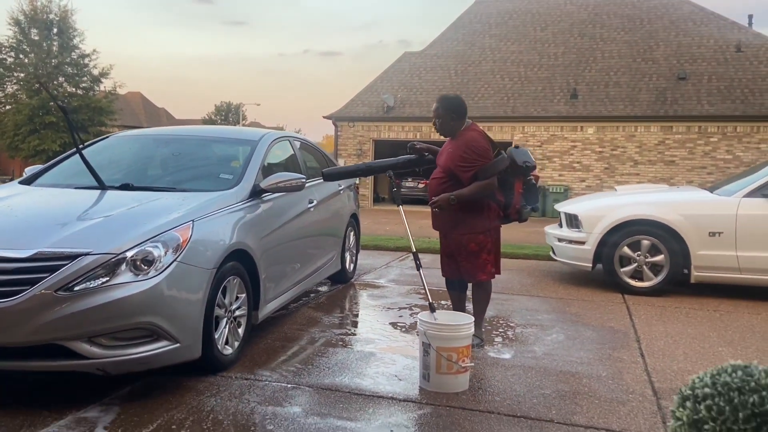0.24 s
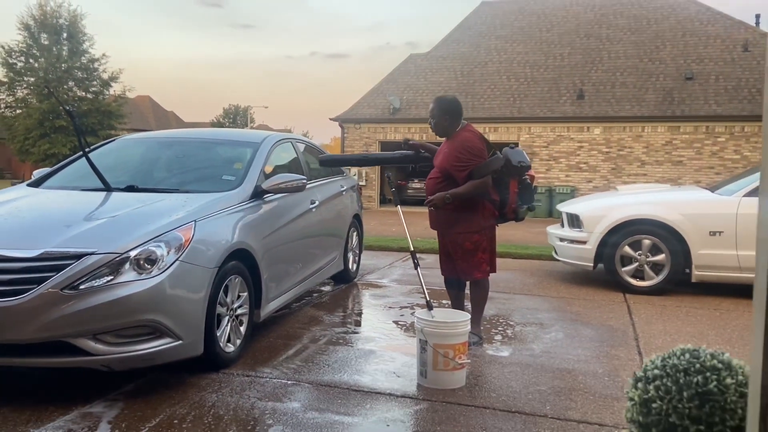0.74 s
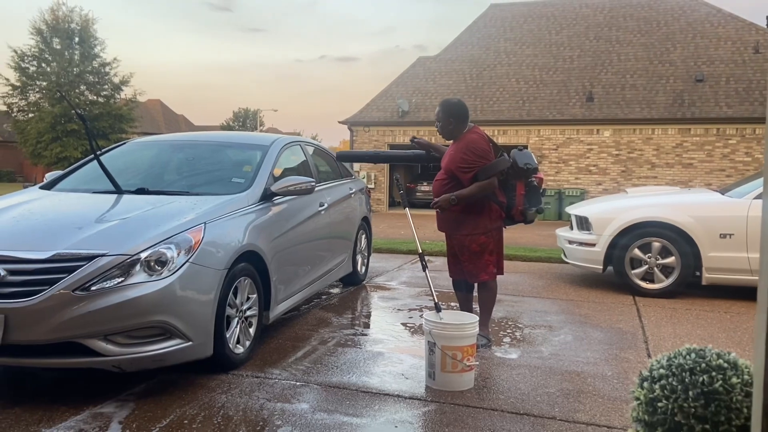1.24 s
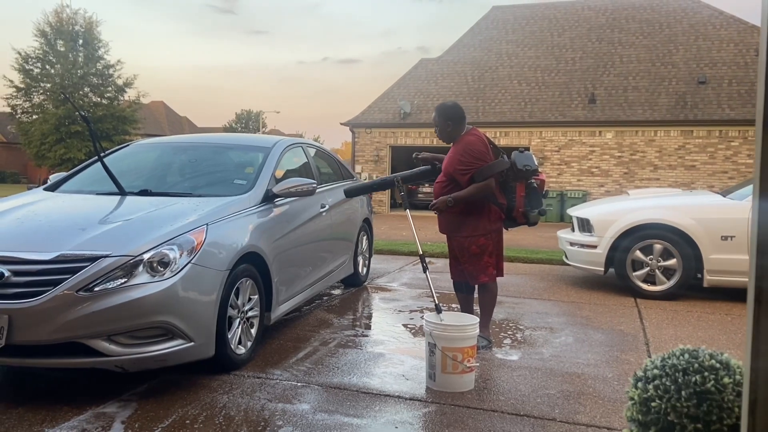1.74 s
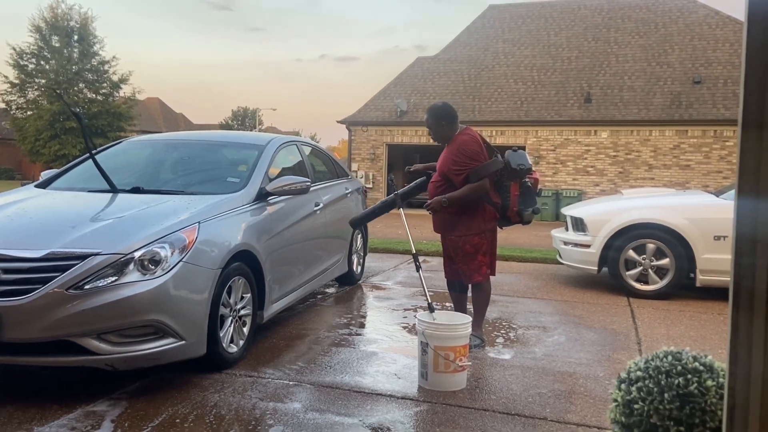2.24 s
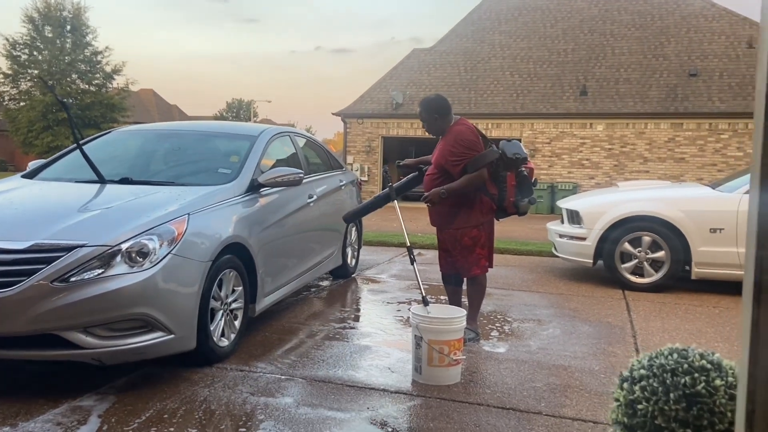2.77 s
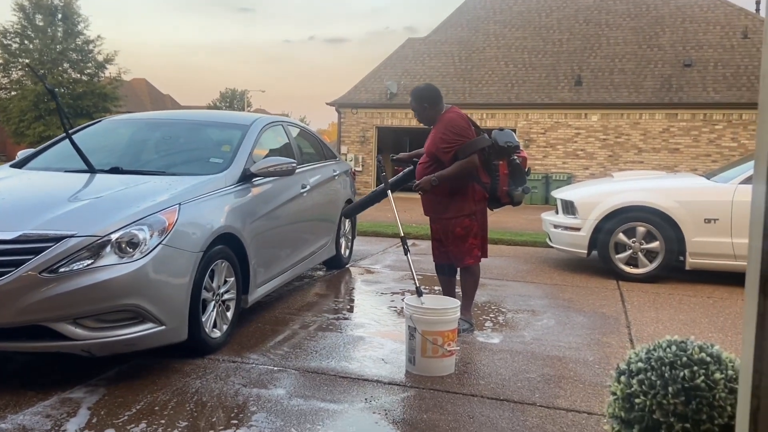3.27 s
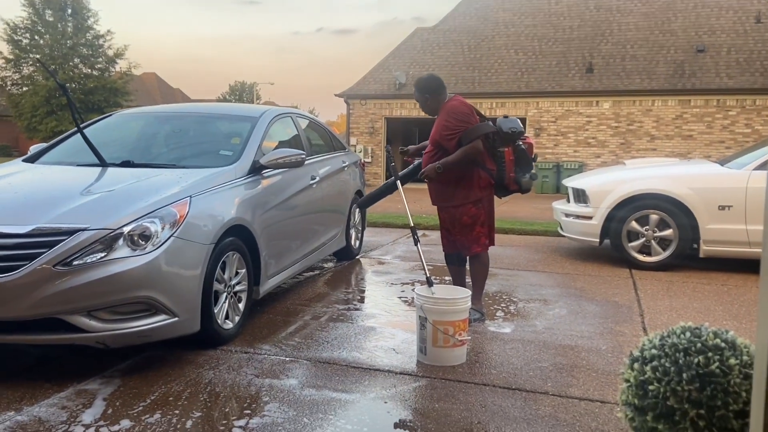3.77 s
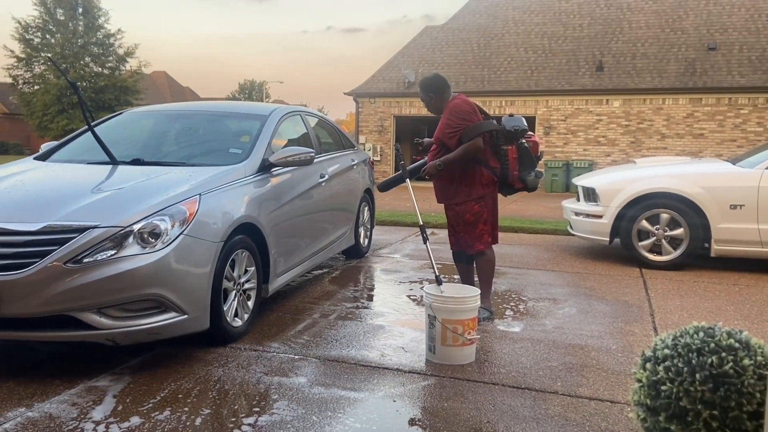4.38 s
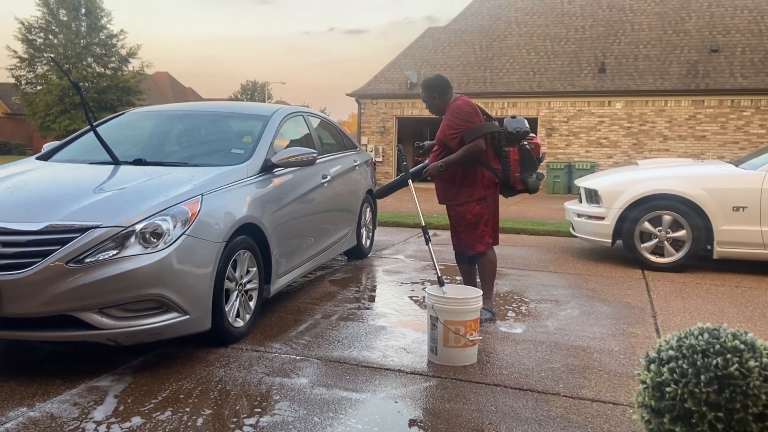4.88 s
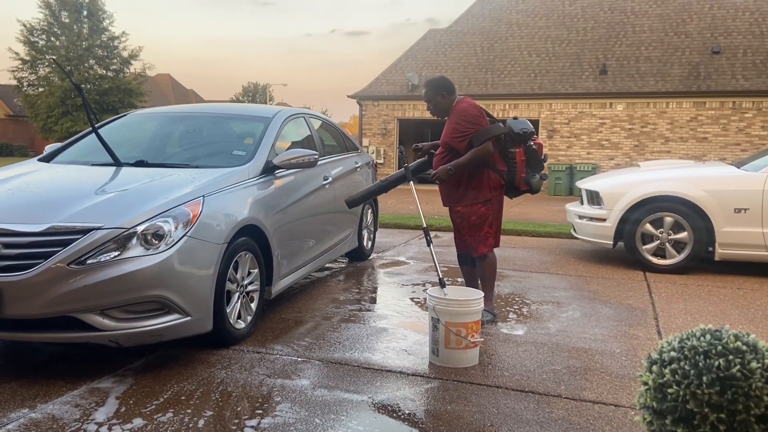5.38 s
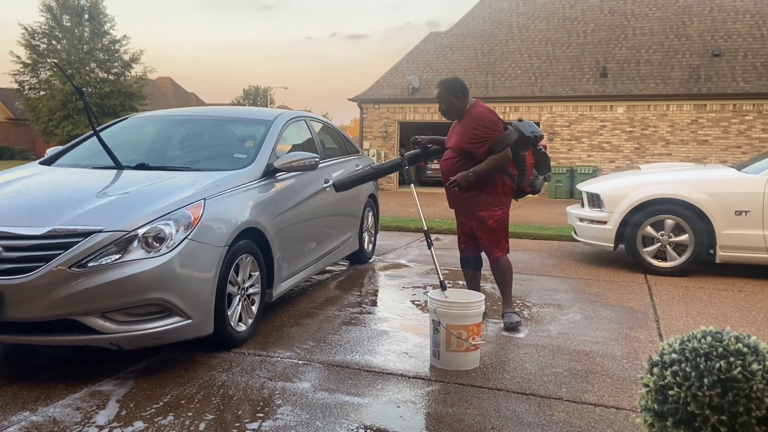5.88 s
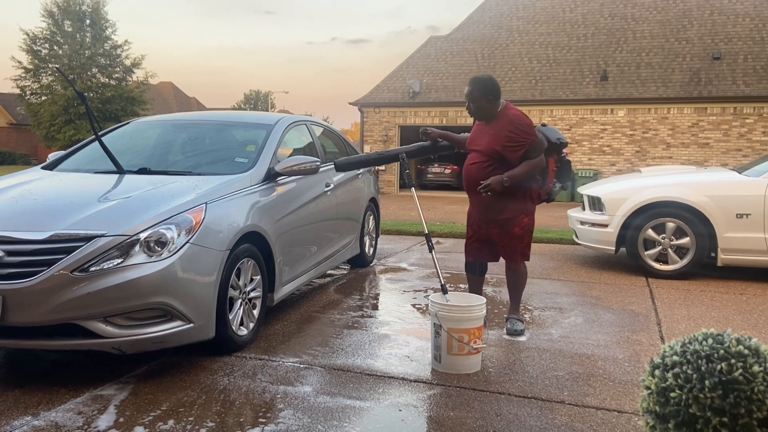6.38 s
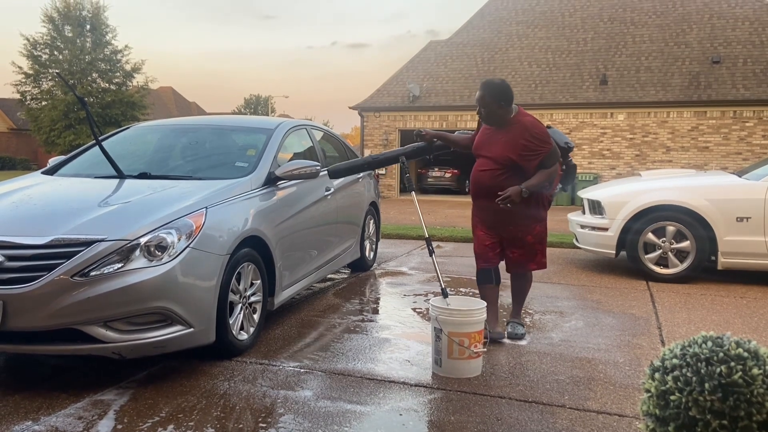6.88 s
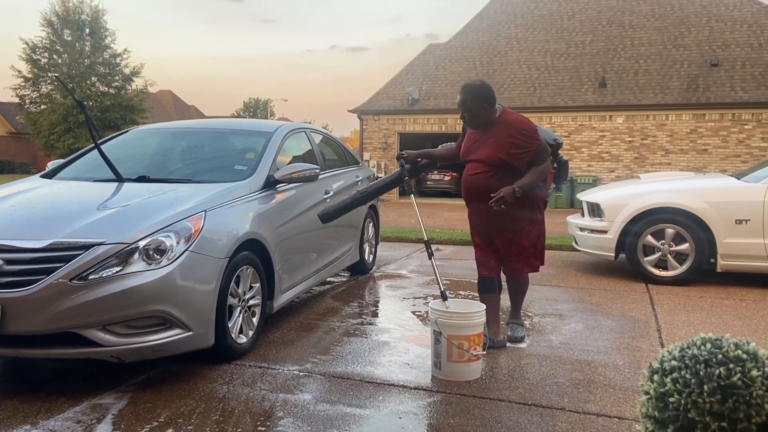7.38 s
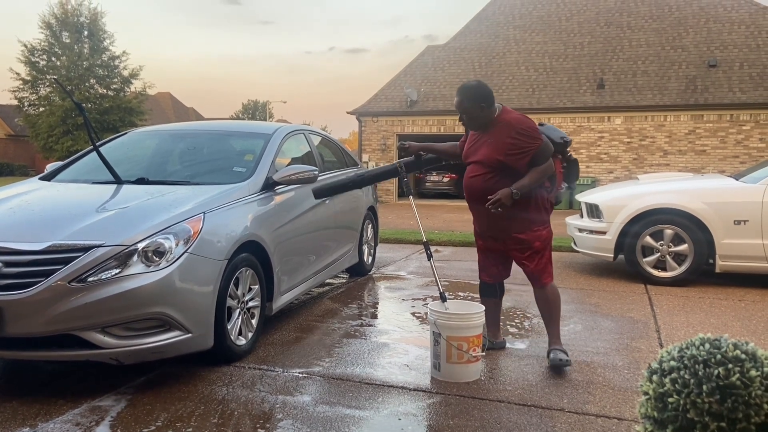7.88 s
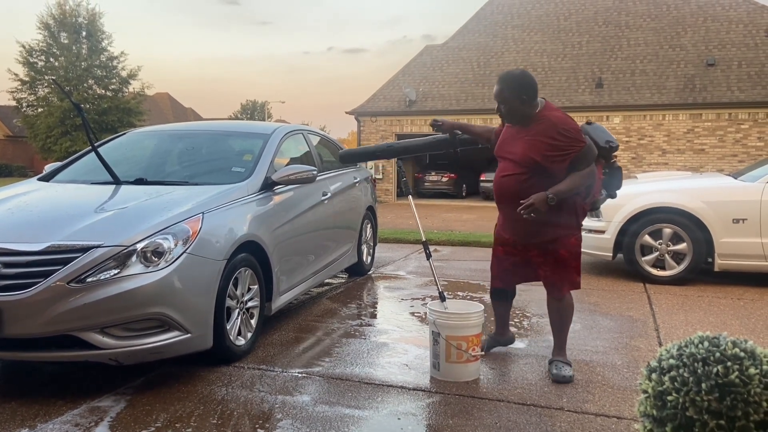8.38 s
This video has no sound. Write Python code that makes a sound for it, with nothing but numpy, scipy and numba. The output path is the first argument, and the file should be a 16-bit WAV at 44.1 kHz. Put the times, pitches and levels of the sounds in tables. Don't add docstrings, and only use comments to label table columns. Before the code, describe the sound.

Steady two-stroke engine buzz and dense, windy roar, already running at the start and still running at the end. The air blast swells in different ranges as it strikes a wet car, briefly making hollows sing low and mid-pitched. Higher ringing whines drift past. Toward the end the wearer turns, dulling the fan and changing the engine's colour. Outdoor driveway, stereo phone a few metres away, slightly compressed.

```python
import sys
import numpy as np
from scipy import signal
from scipy.fft import rfft, irfft, next_fast_len
from scipy.io import wavfile
from scipy.ndimage import uniform_filter1d
from numba import njit

SR = 44100
rng = np.random.default_rng(int(sys.argv[2]) if len(sys.argv) > 2 else 0)


def gain_from_decibels(decibels):
    exponent = np.asarray(decibels, float) / 20
    return 10 ** exponent


def transcribe(u):
    v = np.clip(np.atleast_2d(u).T, -1, 1)
    q = np.round(v * 32767).astype(np.int16)
    wavfile.write(sys.argv[1], SR, q)


N = 380580
STEP = 30
TIME = np.arange(N // STEP + 2) * STEP / SR

# (start [s], end [s], first pitch [Hz], last pitch [Hz], level [dB])
HOLLOW_HUMS = [
    (1.32, 1.6, 102, 102, -40),
    (1.6, 2.2, 102, 102, -48),
    (2.8, 3.6, 101, 100, -46),
    (3.897, 4.75, 101, 101, -39),
    (1.45, 1.8, 270, 338, -39.5),
    (1.85, 2.052, 305, 320, -36),
    (3.62, 3.83, 335, 319, -36),
    (4.22, 4.55, 308, 300, -37.5),
    (4.552, 4.72, 300, 325, -41),
]
# (frequency [Hz], level [dB per Hz])
JET_COLOUR = [(25, -93), (42, -81), (63, -66), (100, -63), (150, -65), (210, -59), (320, -58.5), (480, -59),
              (750, -54), (1400, -59), (2200, -64), (3600, -71), (6500, -75), (16000, -87.5)]
# (frequency [Hz], common share [0-1])
PORT_LIKENESS = [(60, 0.87), (250, 0.8), (640, 0.49), (1400, 0.44), (2500, 0.36), (5300, 0.24),
                 (6800, 0.74), (9000, 0.98), (16000, 0.29)]
# (frequency [Hz], left minus right [dB])
PORT_BALANCE = [(60, 0), (110, 2), (200, 4.5), (380, -1.0), (700, 1.5), (1290, 2), (2380, -1), (4400, 3),
                (8120, 0.0), (15000, 0.0)]
# (frequency [Hz], lead [rad])
PORT_LEAD = [(30, 0), (1000, -.1), (2400, -.8), (4000, -.4), (5600, -2.5), (6800, 0), (8450, .84 * np.pi),
             (9550, 1.15 * np.pi), (11050, 2 * np.pi), (13200, 3 * np.pi), (17400, 5 * np.pi)]
# (frequency [Hz], width [Hz], level [dB])
REFLECTIONS = [(305, 60, 1.5), (400, 50, -1.5), (1110, 280, -2), (1420, 270, 1.5), (1800, 330, -2),
               (2185, 350, 2), (2650, 210, -1.5), (3110, 630, 3.5), (4580, 400, -2), (5430, 550, 1),
               (6500, 1460, -2), (8260, 2300, 2)]
# (start
# [s], end [s], centre [Hz], level [dB])
ROAR_SWELLS = [(-0.1, 0.7, 330, 5), (-0.1, .58, 680, 6.3), (.7, 1.45, 380, -2), (1.5, 2.7, 280, 4),
               (2.76, 3.68, 370, 7.5), (5.07, 5.8, 340, 3), (6, 6.42, 294, 7), (6.25, 6.3, 830, 2.5),
               (6, 6.0, 60, 2), (5.5, 6.4, 55, 7), (6.5, 8.0, 60, 2), (-.2, 2.3, 70, -3),
               (2.5, 2.3, 290, 1.5), (2.7, 5.7, 5300, 1), (2.3, 5.0, 12000, 0.5), (6.4, 8.8, 12000, -1.6),
               (8, 7.7, 540, 2), (5.5, 7.0, 410, -1.5), (.8, 2.4, 165, -5), (6.5, 8.7, 180, 2),
               (6, 7.1, 710, 2), (7.22, 7.88, 293, 12.5), (8, 8.3, 750, 4.5), (3, 4.3, 2400, 1.5),
               (5.0, 5.5, 1700, 0.5)]
# (time [s], turns per second [Hz])
SHAFT_SPEED = [(0.0, 119.58), (0.2, 119.66), (0.45, 119.21), (1.95, 119.08), (2.2, 119.22), (2.45, 119.66),
               (2.95, 119.17), (3.45, 119.08), (3.9, 119.5), (4.2, 119.1), (4.7, 119.27), (5.15, 119.12),
               (5.5, 119.6), (5.95, 119.67), (7.2, 119.08), (7.7, 119.36), (7.95, 119.87), (8.63, 119.51)]
# (time [s], hidden share [0-1])
WEARER_TURN = [
    (0, 0.04),
    (5.6, 0.02),
    (6.3, 0.47),
    (6.9, 0.85),
    (7.8, 1),
    (8.63, 0.9),
]
# (centre [order], level [dB], fall [dB per order])
FAN_WHINE = [(33, -49, 4), (38, -59, 1), (43, -56.5, 5.5), (52, -66, -2.5), (61, -60, 2.5)]
# (start [s], end [s], centre [order], level [dB])
CASING_GLINTS = [
    (1.3, 2.85, 79, -48.5),
    (3.55, 4.9, 44, -50.5),
    (4.1, 5.1, 63, -53.5),
    (2.6, 3.3, 42, -56),
    (5.6, 5.9, 48, -58),
    (5.7, 5.9, 31, -51),
    (1.3, 3.3, 60, -60.5),
]
# (multiple of shaft [order], level [dB])
PACK_SIDE = [(1, -5), (2, 0.5), (3, -12), (4, -15.5), (5, -6.5), (6, -12.5), (7, -2), (8, -8), (9, -35),
             (10, -24.5), (11, -10.5), (12, -12), (13, -14), (14, -16), (15, -23), (16, -25), (17, -21.5),
             (18, -18), (19, -28), (20, -36.5), (21, -39), (22, -32), (23, -27), (24, -20), (25, -24),
             (26, -20), (27, -22), (28, -25.5), (29, -16), (30, -32.5)]
# (multiple of shaft [order], level [dB])
PACK_HIDDEN = [(1, -5), (2, 0), (3, -15.5), (4, -17), (5, -22), (6, -3), (7, -11), (8, -12), (9, -13.5),
               (10, -26), (11, -15), (12, -11), (13, -17), (14, -16.5), (15, -27), (16, -23), (17, -14),
               (18, -29), (19, -30), (20, -23), (21, -28), (22, -19), (23, -22.5), (24, -33), (25, -25),
               (26, -24), (27, -24), (28, -25), (29, -20.5), (30, -37)]
# (multiple of shaft [order], left minus right [dB], left lead [rad])
PORT_ORDERS = [(1, 0, 0.47), (2, 3, 0.27), (3, -4, -1), (5, 11.5, -0.41), (7, 2, 0.041), (8, 1, 0.31)]
# (time [s], level [dB])
WEARER_LEAN = [(0, 1.5), (.45, 0), (2, 1.5), (2.55, 4), (3.4, -0.5), (3.95, 0.5), (4.4, -2), (5.2, -2.5),
               (5.6, -1.5), (6.2, -3), (7.4, 0), (7.75, 3.5), (8.63, 2)]
LEAN_SHARE = [(2, 0.99), (7, 0.68)]
# (start [s], end [s], multiple of shaft [order], level [dB])
PACK_SWAYS = [(-0.5, 2.4, 1, -1), (7.2, 8.7, 1, 1.5), (-.1, 1.87, 3, -6.5), (4.5, 6.7, 4, -6),
              (0, 0.59, 5, 4), (3, 3.5, 5, 2.5), (5.5, 5.75, 5, -3.5), (6, 6.65, 5, 2.5),
              (-0.5, .9, 6, -11), (3.5, 4.6, 6, 4.5), (5.5, 5.75, 6, 3), (5.95, 6.75, 6, -10),
              (0.2, 0.64, 7, -1.5), (1, 3.8, 7, 1.6), (6.5, 7.9, 7, -5), (2.8, 5.95, 8, 1.8),
              (5.5, 6.9, 11, -8), (0, 0.73, 12, 6), (1.62, 1.81, 12, 8), (2.2, 3.2, 12, 3),
              (3.5, 3.84, 12, 8.5), (4.2, 5.7, 12, 6.5), (6.5, 7.0, 12, 4), (8, 8.4, 12, 6.5),
              (.35, 1.56, 13, -7), (4.5, 6.2, 26, 5), (-0.7, 2.4, 27, 5), (.9, 3.4, 28, 0),
              (5.5, 6.4, 29, -12), (2, 5.5, 29, 1.5)]


def curves(table):
    s, *columns = np.transpose(table)
    return [np.interp(TIME, s, column) for column in columns]


def along(table, hz):
    at_hz, value = np.transpose(table)
    return np.interp(np.log(hz), np.log(at_hz), value)


def every_sample(control):
    return np.interp(np.arange(N) / SR, TIME, control)


def spell(start, end, ramp_s):
    return np.clip(np.minimum(TIME - start, end - TIME) / ramp_s + .5, 0, 1)


def walk(rate):
    hold = int(SR / STEP / rate)
    levels = np.repeat(rng.standard_normal(len(TIME) // hold + 1), hold)
    smooth = uniform_filter1d(uniform_filter1d(levels, hold), hold)
    return 1.316 * smooth[:len(TIME)]


@njit
def tone(phase, gain, step):
    out = np.empty((len(phase) - 1) * step)
    for j in range(len(phase) - 1):
        z = np.exp(1j * phase[j])
        turn = np.exp(1j * (phase[j + 1] - phase[j]) / step)
        for i in range(step):
            out[j * step + i] = (gain[j] + (gain[j + 1] - gain[j]) * i / step) * z.real
            z *= turn
    return out


def ports(phase, db, pan_db, lead):
    pair = []
    for side in (1, -1):
        gain = gain_from_decibels(db + side * pan_db / 2)
        pair.append(tone(phase + side * lead / 2, gain, STEP)[:N])
    return np.sqrt(2) * np.array(pair)


def hums():
    out = 0
    for start, end, from_hz, to_hz, db in HOLLOW_HUMS:
        glide_hz = np.interp(TIME, [start, end], [from_hz, to_hz])
        hz = glide_hz * (1 + .014 * walk(14))
        phase = 2 * np.pi * np.cumsum(hz) * STEP / SR
        hum = ports(phase, db + 2.0 * walk(10), -2, .3)
        out = out + every_sample(spell(start, end, 0.11)) * hum
    return out


def jet_air():
    size = next_fast_len(N)
    hz = np.maximum(np.arange(size // 2 + 1) * SR / size, 1)
    common, left, right = rfft(rng.standard_normal((3, size)))
    like = np.clip(along(PORT_LIKENESS, hz), 0, 1)
    lead = np.interp(hz, *np.transpose(PORT_LEAD))
    pan_db = along(PORT_BALANCE, hz)
    colour_db = along(JET_COLOUR, hz) + 10 * np.log10(SR / 2)
    for at_hz, width_hz, db in REFLECTIONS:
        colour_db = colour_db + db * np.exp(-((hz - at_hz) / width_hz) ** 2 * 2)
    together, apart = np.sqrt(like) * common, np.sqrt(1 - like)
    left = gain_from_decibels(colour_db + pan_db / 2) * (together + apart * left)
    right = gain_from_decibels(colour_db - pan_db / 2) * (together * np.exp(1j * lead) + apart * right)
    return irfft(np.array([left, right]), size)[:, :N]


def jet_gusts(hz, s):
    strike_octaves, lumpy_share = 0.67, .12
    rumble_gust_db, patchy_db, flicker_db, shared_db = 1.5, 0.59, 0.9, 0.26
    strikes = []
    for start, end, at_hz, db in ROAR_SWELLS:
        swell = db * spell(start, end, 0.15) * (1 + lumpy_share * walk(14))
        strikes.append((at_hz, swell))
    gain, shared, gust = 0, walk(12), walk(8)
    for third in range(29):
        centre_hz = 25 * 2 ** (third / 3)
        from_centre = np.clip(3 * np.log2((hz + 1) / centre_hz), -1, 1)
        band = np.cos(np.pi / 2 * from_centre) ** 2
        db = 0
        for at_hz, swell in strikes:
            db = db + swell * np.exp(-(np.log2(centre_hz / at_hz) / strike_octaves) ** 2)
        db = db + rumble_gust_db * gust * min(70 / centre_hz, 1) ** 2
        shared = .6 * shared + .8 * walk(14)
        db = db + shared_db * shared
        db = db + flicker_db * walk(30) * min(centre_hz / 6000, 1.5)
        db = db + patchy_db * walk(2.5)
        gain = gain + np.outer(band, np.interp(s, TIME, gain_from_decibels(db)))
    return gain


def jet(shaft):
    frames = dict(fs=SR, nperseg=2048, noverlap=1536)
    hz, s, air = signal.stft(jet_air(), **frames)
    gain = jet_gusts(hz, s)
    treble = np.minimum(hz / 1500, 1)[:, None]
    lag_s = np.interp(s, TIME, .0024 + .00012 * walk(1.5))
    gain = gain * (1 + 0.23 * treble * np.cos(2 * np.pi * np.outer(hz, lag_s)))
    steady = signal.istft(air * gain, **frames)[1][:, :N]
    throbbing = signal.istft(air * gain * .13 * treble, **frames)[1][:, :N]
    return steady + throbbing * np.cos(every_sample(shaft))


def cluster(shaft, centre, db, fall_db):
    out = 0
    for k in round(centre) + np.arange(-2, 3):
        port_lead = np.interp(k * SHAFT_SPEED[0][1], *np.transpose(PORT_LEAD))
        lead = -port_lead * (k > 55) + .5 * walk(2)
        fading_db = 2 * walk(2) + 2.2 * walk(20)
        phase = k * shaft + 6 * rng.random() + .7 * walk(15)
        order_db = db - fall_db * abs(k - round(centre)) + fading_db
        out = out + ports(phase, order_db, 1.4, lead)
    return out


def fan(shaft):
    hidden, = curves(WEARER_TURN)
    out = 0
    for centre, db, fall_db in FAN_WHINE:
        out = out + cluster(shaft, centre, db - 4 * hidden, fall_db)
    for start, end, centre, db in CASING_GLINTS:
        facing = np.clip(np.minimum(TIME - start, end - TIME) / 0.065, 0, 1)
        out = out + cluster(shaft, centre, db + 20 * np.log10(facing + 1e-4), fall_db=4)
    return out


def stance():
    lean_db, = curves(WEARER_LEAN)
    change = {round(k): share * lean_db for k, share in LEAN_SHARE}
    for start, end, k, db in PACK_SWAYS:
        change[round(k)] = change.get(round(k), 0) + db * spell(start, end, .16)
    return change


def engine(shaft, stance_db, order_one_db=-29.5):
    hidden, = curves(WEARER_TURN)
    leaning = {k: (pan_db, lead) for k, pan_db, lead in PORT_ORDERS}
    out = 0
    for (k, side_db), (_, hidden_db) in zip(PACK_SIDE, PACK_HIDDEN):
        from_side = (1 - hidden) * (side_db - PACK_SIDE[0][1])
        from_behind = hidden * (hidden_db - PACK_HIDDEN[0][1])
        loose = min(k / 14, 1) ** 1.5
        db = order_one_db + from_side + from_behind + stance_db.get(k, 0) - 2.5 * (k > 8)
        db = db + 1.8 * loose * walk(4) * (k not in stance_db) + 2 * loose * walk(20)
        pan_db, lead = leaning.get(k, (1.5, -.3))
        start = (.4 + .7 * loose) * rng.standard_normal() + .4 * loose * walk(15)
        start = start + (np.pi if k > 3 else 1.3 * k)
        pan_db = pan_db + 4 * loose * walk(2.01)
        lead = lead + 1.26 * loose * walk(1.95)
        out = out + ports(k * shaft + start, db, pan_db, lead)
    return out


def scene():
    hz, = curves(SHAFT_SPEED)
    shaft = 2 * np.pi * np.cumsum(hz * (1 + .001 * walk(25))) * STEP / SR
    return hums() + jet(shaft) + fan(shaft) + engine(shaft, stance())


def low_pass(x):
    return signal.sosfilt(signal.butter(12, 16720, fs=SR, output="sos"), x)


def record(dry):
    settle_db, settle_s, top_hz = 2, 0.53, 15550
    gain = every_sample(gain_from_decibels(settle_db * spell(-1, settle_s, 0.29)))
    rounded = np.tanh(dry * gain * .8) / .8
    top_cut = signal.ellip(10, .2, 80, top_hz, fs=SR, output="sos")
    mix = signal.sosfilt(top_cut, rounded)
    return low_pass(mix)


dry = scene()
out = record(dry)
transcribe(out)
```